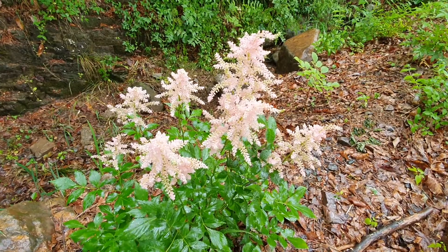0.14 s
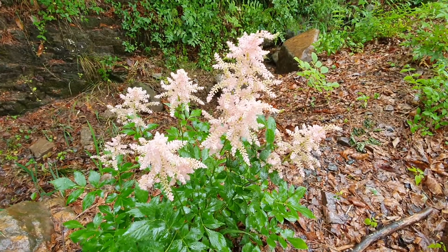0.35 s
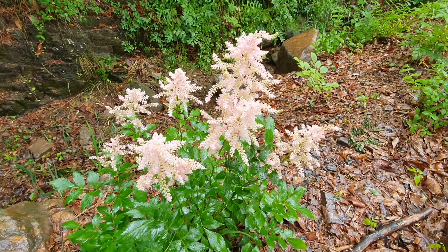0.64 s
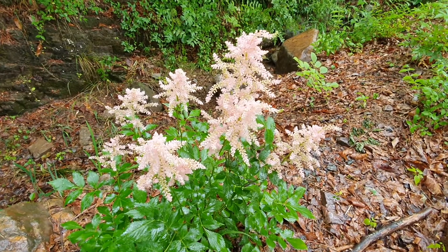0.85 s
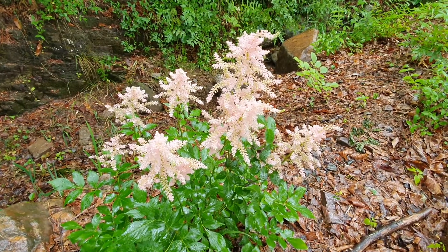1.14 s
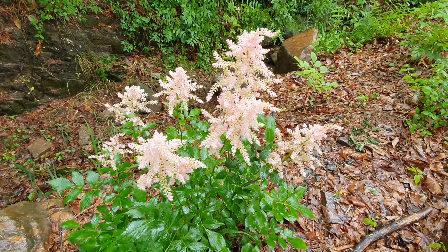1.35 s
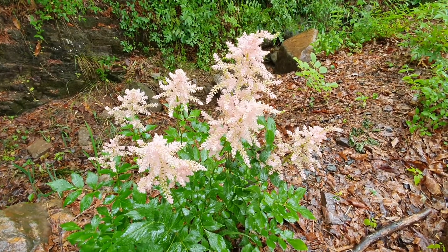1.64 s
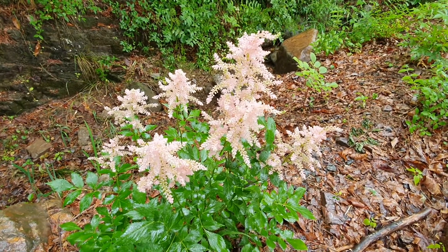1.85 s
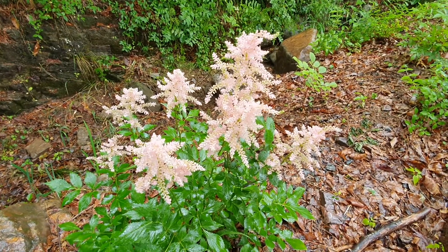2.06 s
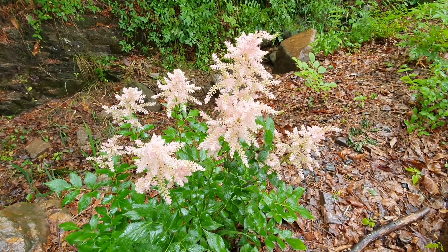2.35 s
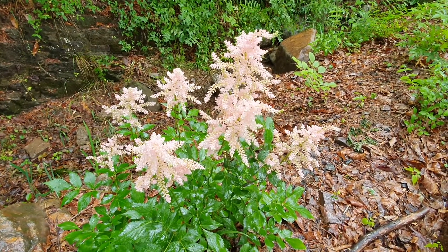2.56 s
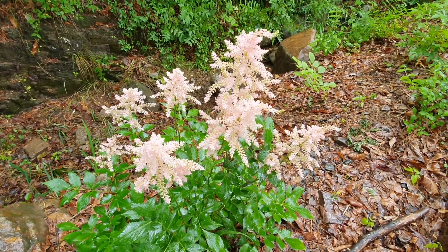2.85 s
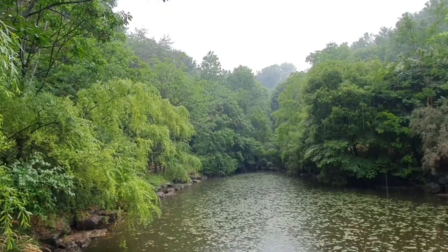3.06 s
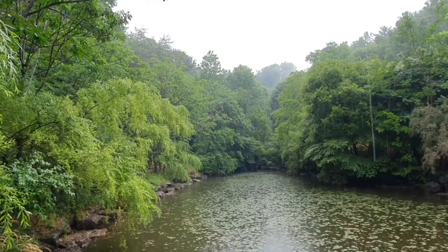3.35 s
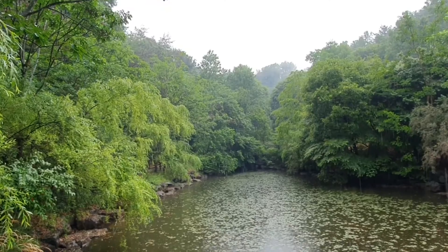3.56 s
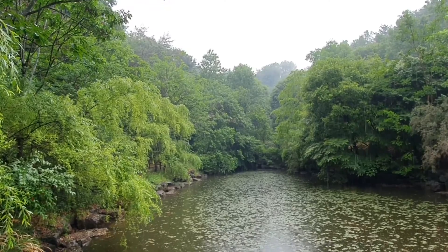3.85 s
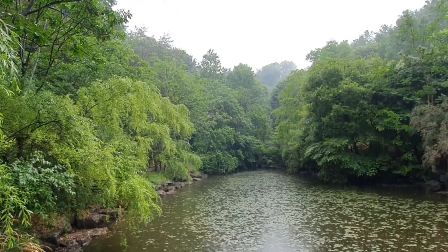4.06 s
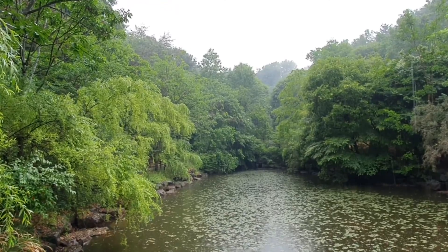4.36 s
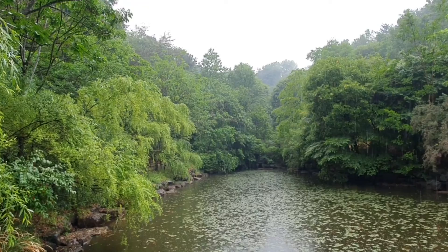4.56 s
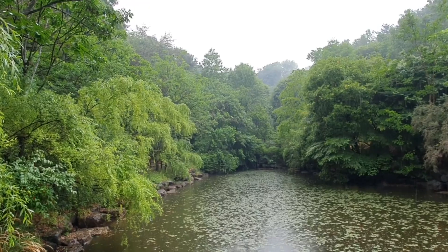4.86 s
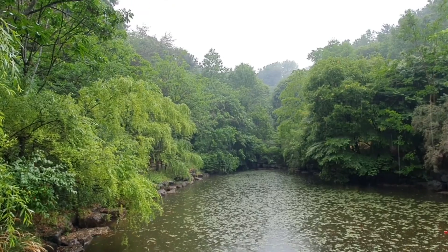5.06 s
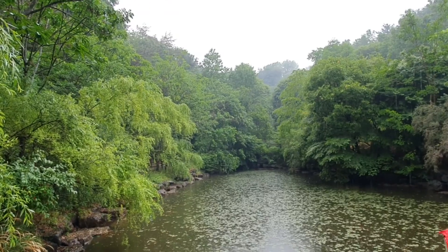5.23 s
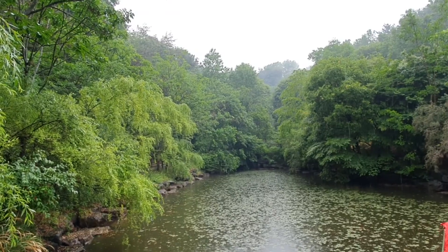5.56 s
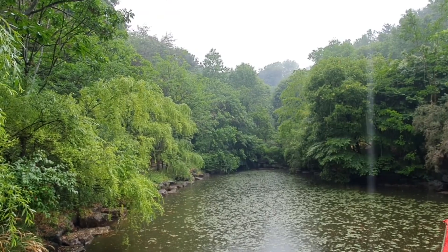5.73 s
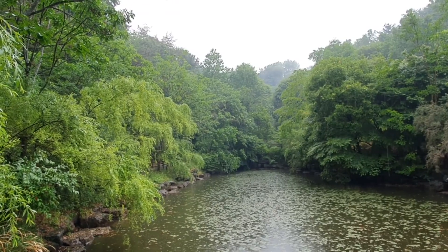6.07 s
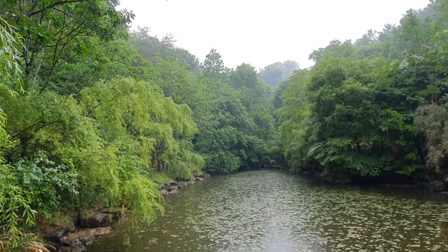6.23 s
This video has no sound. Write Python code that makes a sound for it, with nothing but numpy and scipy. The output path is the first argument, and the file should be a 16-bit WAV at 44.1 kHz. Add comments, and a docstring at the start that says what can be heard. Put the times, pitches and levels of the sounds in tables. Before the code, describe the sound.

Rain falls evenly throughout, heard in wide stereo from among leaves. Far away it blends into a low, soft noise with tiny watery plops; around the microphones small drops patter and crackle over a gentle hiss. Heavier drips tap nearby leaves irregularly, leaning right: a lively run early on, thin spacing in the middle, a small soft cluster near five seconds, and one clearer tick close to the end.

```python
"""Steady rain on a wooded garden and a pond, heard in stereo from among the leaves.
Far off it merges into a soft noise wash with faint plops; all around, small drops patter on foliage
as short rings over a hiss. Close to the microphones, mostly to the right, heavier drips tick on leaves:
damped notes plus a slap of noise, each followed by a little spray and a short answer from the bushes."""
import sys
import numpy as np
from scipy import signal
from scipy.fft import rfft, irfft, next_fast_len
from scipy.io import wavfile
from scipy.ndimage import uniform_filter1d, map_coordinates

SR = 44100
rng = np.random.default_rng(int(sys.argv[2]) if len(sys.argv) > 2 else 0)


def master(y):
    """Save y as 16-bit WAV."""
    cut = np.clip(np.atleast_2d(y).T, -1, 1)
    pcm = np.round(cut * 32767)  # scale
    wavfile.write(sys.argv[1], SR, pcm.astype(np.int16))


N = 282240  # samples

# Far rain, relative spectrum of the wash: [f/Hz, level per Hz/dB]
WASH_SPECTRUM = [(20, -1), (35, -3.5), (60, -1), (140, -1), (330, 0.17), (470, -2.5), (780, -2),
                 (1080, -0.2), (1500, -4.5), (2000, -10), (3200, -15.5), (6000, -47.5)]
# Rain on foliage, relative spectrum of the hiss: [f/Hz, level per Hz/dB]
HISS_SPECTRUM = [(600, -31), (1500, -3), (2700, -2), (4000, -2.5), (5500, -2.5), (7400, -5.5)]
# Correlation of left and right in the far wash: [f/Hz, correlation (1 = identical)]
LIKENESS = [(40, .74), (200, 0.76), (550, 0.5), (1100, 0.8), (1600, 0.52), (2300, 0.066), (3500, 0.061)]
# Stereo balance of the rain bed: [f/Hz, left minus right/dB]
BED_LEAN = [(40, 0), (300, -2.5), (700, -0.2), (3000, 0.2), (4500, 0.5), (6500, 0)]
# Thickening and thinning of the foliage rain, used about its mean: [t/s, level/dB]
FOLIAGE_SWELL = [(0.0, -44), (0.53, -46), (1.71, -43.5), (2.01, -44.5), (3.94, -45), (4.53, -45.5),
                 (4.83, -43.5), (5.86, -45), (6.4, -44)]
# Drips on near leaves: [t/s, level as rms over 2 ms/dB, damping/s^-1 (also widens the slap band, in Hz),
# left minus right/dB, spray relative to drip/dB, notes of the leaf [f/Hz, relative level/dB]]
NEAR_DRIPS = [(0.1696, -34, 1900, -9, -22, [(6000, 0)]), (0.3506, -29, 1700, -2.5, -8, [(3200, -15),
              (5800, 3), (7100, -2)]), (0.6493, -20.5, 1250, -3, -9, [(2900, -9), (4500, -2), (6250, -4)]),
              (0.9410, -38, 1100, -4, -17, [(3200, -3)]), (1.0424, -26, 1400, -2, -9, [(2750, -3),
              (4400, -2), (6900, -1)]), (1.0885, -23.5, 850, -3.5, -15, [(3600, -3), (5700, -3),
              (7000, -9)]), (1.3965, -36, 1300, -1, -12, [(4200, 0)]),
              (1.4523, -23.5, 1050, -5, -19, [(3700, 2), (6800, -12)]),
              (1.4873, -23, 1200, -6.5, -14, [(5850, 3), (7050, 1)]),
              (1.6028, -35, 1500, 1, -15, [(5200, 0)]), (1.6070, -26, 750, -1.5, -17, [(5850, 0)]),
              (1.63, -38, 1500, -0.5, -18, [(5930, -1), (7000, 2)]),
              (1.7330, -24.5, 1400, -3, -3, [(4000, -5.5), (6000, -2.5), (7100, -5)]),
              (1.7657, -20.5, 1200, -3.5, -5, [(3750, 0), (5350, -1), (6650, -1)]),
              (1.977, -29, 1400, -3, -2, [(4100, -7), (6000, 1)]),
              (2.019, -33.5, 1900, -7, -10, [(4280, 0)]), (2.1375, -34.5, 2000, -5, -2, [(4300, 0)]),
              (2.4097, -38, 1500, -2, -11, [(3200, 0)]), (3.124, -30.5, 1500, -3, -3, [(3700, -2),
              (5600, -2)]), (3.3214, -30.5, 1050, -2, -18, [(5350, 0)]),
              (3.452, -37, 1400, -6, 1, [(3400, 0)]), (3.869, -27.5, 1710, -3.5, -1, [(3200, -7),
              (4700, -1)]), (4.0087, -27.5, 1500, -1, -16, [(3700, -10), (5300, -6), (6750, 2)]),
              (4.3844, -35, 1200, 9, -14, [(3400, 0)]), (4.425, -33.5, 1400, -7, -10, [(3900, 0)]),
              (4.4365, -35.5, 1500, -1.5, -19, [(6400, 0)]), (4.7025, -33, 1630, -1.5, 2, [(6900, 0)]),
              (4.7543, -31, 1110, -6, -2, [(4570, 0)]), (4.764, -33, 1300, 2, -3, [(6140, 0)]),
              (4.7710, -31.5, 1530, -9, -12, [(1870, 0)]), (4.7946, -37, 1400, 2, -15, [(6360, 0)]),
              (4.8435, -28, 700, -8, -7, [(330, -1), (1250, 1), (2200, -3)]),
              (5.2485, -39, 1100, -8, -15, [(4000, 0)]), (5.2790, -28.5, 1500, -5, -9, [(6100, -1),
              (7100, 1)]), (5.4880, -37, 1900, -7, -2, [(4000, 0)]),
              (5.7297, -34, 1400, -9, -12, [(5900, 0)]), (5.74, -32, 1600, -4, -5, [(4720, 0)]),
              (5.8478, -28.5, 1400, -3, -9, [(6670, 0)]), (5.8547, -35, 1900, -3.5, -4, [(5900, 0)]),
              (6.1931, -25.5, 1500, -4, -2, [(3600, -2), (4600, -4), (6050, -2)]),
              (6.3075, -38, 2000, -1.5, -3, [(4500, 0)])]
# Decay of the answer from the bushes: [f/Hz, time to fall 60 dB/s]
BUSH_DECAY = [(1000, 0.16), (4000, 0.066), (7500, 0.11)]

TOP_HZ = 7500  # upper band limit
WASH_DB, FOLIAGE_DB, CRACKLE_DB = -37, -41.5, -52
EAR_LAG_S, ASIDE_DB = 0.000105, 3.5  # greatest delay to the far channel; lean that counts as aside
FLATTEN_S = 0.0005  # time a drop takes to flatten on a leaf
SPRAY_DELAY_S, SPRAY_FADE_S = 0.0033, 0.013  # shortest wait after the drip; time constant of the rest
SPRAY_SPREAD, SPRAY_DAMPING = 0.45, 2300  # full log range of pitch; damping in 1/s
SPRAY_RANGE_DB = 13  # full range of left-right scatter about the drip


def amp(db):
    """Decibels to gain."""
    return 10 ** (np.asarray(db) / 20)


def unit(x):
    """Scale to rms 1."""
    return x / np.sqrt(np.mean(x ** 2) + 1e-20)


def along(points, hz):
    """Read a curve of (Hz, value) points joined on a log frequency axis."""
    f, value = np.transpose(points)
    return np.interp(np.log(hz + 1), np.log(f + 1), value)


def wobble(rate):
    """A smooth random curve with the given number of knots a second."""
    knots = rng.standard_normal(int(N * rate / SR) + 4)
    return map_coordinates(knots, [np.arange(N) * rate / SR])


def filtered(x, response):
    """Shape the spectrum of x by a gain that depends on frequency."""
    m = next_fast_len(N + SR // 2)
    spectrum = rfft(x, m) * response(np.fft.rfftfreq(m, 1 / SR))
    return irfft(spectrum, m)[..., :N]


def panned(lean_db):
    """Left and right gains of mean power 1, for left minus right in dB."""
    gains = amp(np.array([lean_db, -lean_db]) / 2)
    return gains / np.sqrt(np.mean(gains ** 2, axis=0))


def patchy_noise(patchy_db):
    """Two unrelated noises whose gains drift in patches of time and frequency."""
    z = signal.stft(rng.standard_normal((2, N)), nperseg=1024)[2]
    field = rng.standard_normal(z.shape)
    field = uniform_filter1d(field, size=4, axis=1)  # across frequency
    field = uniform_filter1d(field, size=5, axis=2)  # across time
    return signal.istft(z * amp(patchy_db * unit(field)), nperseg=1024)[1][:, :N]


def shower(count, pitch_hz, spread, cycles, scatter_db, lean_db, width_db):
    """Drops at random moments and places, each a softly starting ring of a few cycles; stereo, rms 1."""
    t = np.arange(SR // 100) / SR
    when, nearness, delay = rng.random((count, 3)).T
    tone, place = rng.standard_normal((count, 2)).T
    hz = np.minimum(pitch_hz * np.exp(spread * tone), SR / 4)
    phase = hz[:, None] * t  # in cycles
    # few drops land near, many far away
    loud = amp(scatter_db * np.minimum(-np.log(1 - nearness), 4))
    envelope = np.exp(-phase / cycles) * (1 - np.exp(-phase))
    rings = loud[:, None] * np.sin(2 * np.pi * phase) * envelope
    lag = (delay - 0.5) * SR / 1500  # samples, opposite in the two channels
    channels = []
    for gain, shift in zip(panned(lean_db + width_db * place), (lag, -lag)):
        at = (when * N + shift).astype(int)[:, None] + np.arange(len(t))
        channels.append(np.bincount(at.ravel() % N, (gain[:, None] * rings).ravel(), N))
    return unit(np.array(channels))


def far_rain():
    """Rain over pond and woods: a noise wash, more alike left and right low down, with soft ringing plops."""
    def mid_side_gains(hz):
        # a side-to-mid ratio of tan(angle) gives a correlation of cos(2 * angle)
        angle = np.arccos(np.clip(along(LIKENESS, hz), -1, 1)) / 2
        return amp(along(WASH_SPECTRUM, hz)) * [np.ones_like(hz), np.tan(angle)]

    mid, side = filtered(patchy_noise(patchy_db=1.55), mid_side_gains)
    wash = unit(np.array([mid + side, mid - side]))
    plops = shower(count=500, pitch_hz=1053, spread=0.3, cycles=9.9,
                   scatter_db=4.0, lean_db=-5.5, width_db=4.5)
    return wash + amp(-16.5) * plops


def foliage():
    """Small drops on leaves: a dense patter of rings over the hiss of those too far to tell apart."""
    patter = shower(count=1500, pitch_hz=4200, spread=0.38, cycles=3,
                    scatter_db=1.0, lean_db=-2, width_db=4.5)
    # the patter takes half the tilt of the hiss
    patter = unit(filtered(patter, lambda hz: amp(along(HISS_SPECTRUM, hz) / 2) * (hz < TOP_HZ)))
    noise = patchy_noise(patchy_db=3.0)
    mid, side = filtered(noise, lambda hz: amp(along(HISS_SPECTRUM, hz)) * (hz < TOP_HZ))
    hiss = unit(np.array([mid + side, mid - side]))
    flurry_db = 0.53 * wobble(14) + 0.5 * wobble(35)  # drops come in flurries
    swell_db = np.interp(np.arange(N) / SR, *np.transpose(FOLIAGE_SWELL))
    leaves = unit(hiss + amp(-9.5) * patter)
    return leaves * amp(flurry_db + swell_db - swell_db.mean())


def drips():
    """Drips strike near leaves and throw off droplets; tiny drops crackle at random throughout."""
    out = np.zeros((2, N + SR))
    for s, db, damping, lean_db, spray_db, notes in NEAR_DRIPS:
        strongest_hz = max(notes, key=lambda note: note[1])[0]
        droplets = spray(s, db + spray_db, strongest_hz, lean_db, count=8)
        for when, level_db, tones, damp, lean in [(s, db, notes, damping, lean_db)] + droplets:
            tick = leaf_tick(tones, damp, lean)
            start = round(when * SR)
            out[:, start:start + tick.shape[1]] += amp(level_db) * tick
    crackle = shower(count=380, pitch_hz=3900, spread=0.33, cycles=1.5,
                     scatter_db=1.6, lean_db=-3, width_db=4)
    return out[:, :N] + amp(CRACKLE_DB) * crackle


def leaf_tick(notes, damping, lean_db, fall_s=0.0012, slap_db=-6):
    """One drip, stereo: the damped notes of its leaf and the broad slap of the water."""
    lag = EAR_LAG_S * np.tanh(lean_db / ASIDE_DB)
    late = np.maximum([[-lag], [lag]], 0)  # only the far channel waits
    t = np.maximum(np.arange(SR // 50) / SR - late, 0)
    swell = 1 - np.exp(-(t / FLATTEN_S) ** 2)
    ring = sum(amp(db) * np.sin(2 * np.pi * (hz * t + rng.random())) for hz, db in notes)
    pitches = [hz for hz, db in notes]
    edges = [min(pitches) - 1.1 * damping, max(pitches) + 1.8 * damping]
    band = np.clip(edges, [100, 300], [0.9 * TOP_HZ, TOP_HZ])
    splash = swell * np.exp(-t / fall_s) * rng.standard_normal(t.shape)
    slap_filter = signal.butter(4, band, "bandpass", fs=SR, output="sos")
    slap = unit(signal.sosfilt(slap_filter, splash))
    note = unit(swell * np.exp(-t * damping) * ring)
    # a limp, well damped leaf gives more slap and less note
    tick = note + (damping / 1400) ** 2.1 * amp(slap_db) * slap
    # as much energy as 2 ms at rms 1
    return panned(lean_db)[:, None] * unit(tick) * np.sqrt(0.002 * SR / t.shape[1])


def spray(s, db, pitch_hz, lean_db, count):
    """Droplets thrown off a drip land ever more thinly and share its splash energy; rows for leaf_tick."""
    late, tone, place = rng.random((count, 3)).T
    flight = -SPRAY_FADE_S * np.log(1 - (np.arange(count) + late) / (count + 1))
    share = np.exp(-flight / SPRAY_FADE_S / 2)
    levels = db + 10 * np.log10(share / share.sum())
    pitches = pitch_hz * np.exp(SPRAY_SPREAD * (tone - 0.5))
    leans = lean_db + SPRAY_RANGE_DB * (place - 0.5)
    return [(s + SPRAY_DELAY_S + wait, level, [(hz, 0)], SPRAY_DAMPING, lean)
            for wait, level, hz, lean in zip(flight, levels, pitches, leans)]


def bushes(x, ground_db=-12.5, ground_t60=0.04, tail_db=-7.5):
    """Echo as decaying noise: the ground answers within milliseconds, the bushes a little longer."""
    hz, t, z = signal.stft(rng.standard_normal((2, SR // 4)), SR, nperseg=256)
    decay = amp(-60 * t / along(BUSH_DECAY, hz)[:, None])
    tail = signal.istft(z * decay, SR, nperseg=256)[1]
    ground_decay = amp(-60 * np.arange(tail.shape[1]) / SR / ground_t60)
    ground = rng.standard_normal(tail.shape) * ground_decay
    echo = amp(tail_db) * tail / np.linalg.norm(tail[0])
    echo = echo + amp(ground_db) * ground / np.linalg.norm(ground[0])
    echo = np.pad(echo, ((0, 0), (SR // 600, 0)))  # shortest path to the echo and back
    return signal.fftconvolve(x, echo, axes=1)[:, :N]


def scene():
    """The rain bed, a little fuller on the right, and the near drips with their echo."""
    bed = amp(WASH_DB) * far_rain() + amp(FOLIAGE_DB) * foliage()
    near = drips()
    return filtered(bed, lambda hz: panned(along(BED_LEAN, hz))) + near + bushes(near)


def record(dry):
    """The recorder cuts steeply above its band limit."""
    return filtered(dry, lambda hz: 1 / np.sqrt(1 + (hz / TOP_HZ) ** 160))


dry = scene()
out = record(dry)
master(out)
```